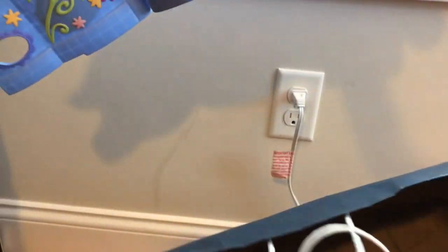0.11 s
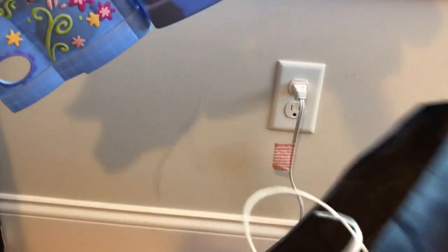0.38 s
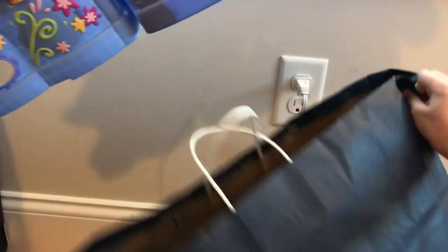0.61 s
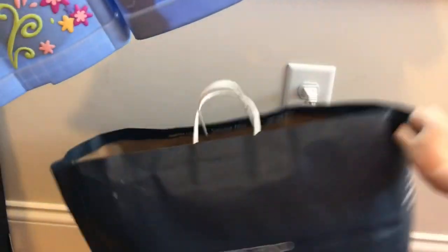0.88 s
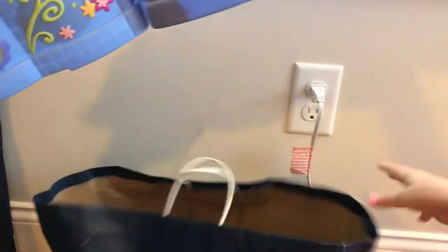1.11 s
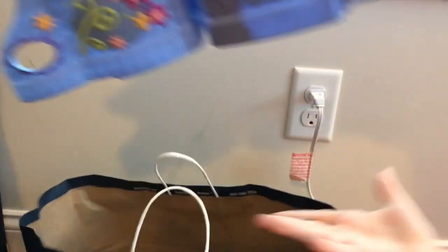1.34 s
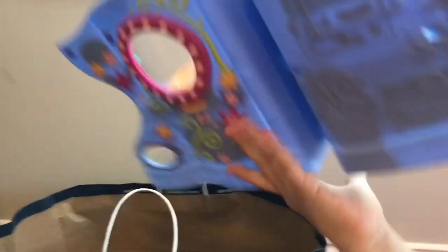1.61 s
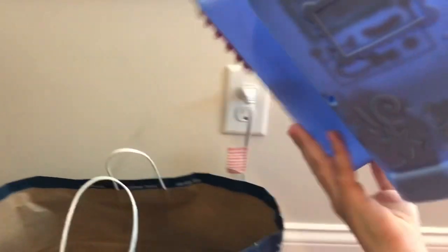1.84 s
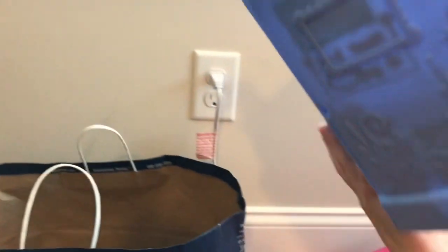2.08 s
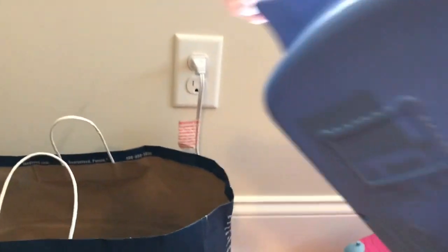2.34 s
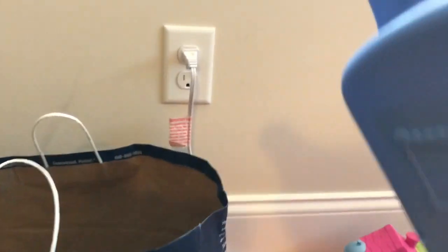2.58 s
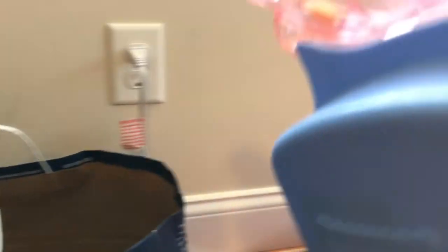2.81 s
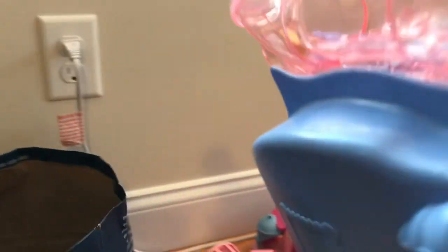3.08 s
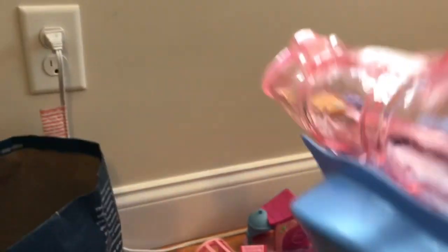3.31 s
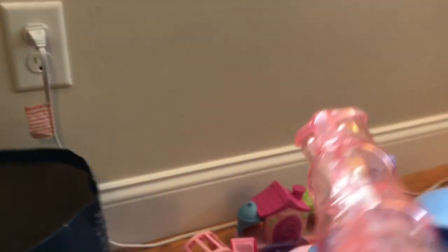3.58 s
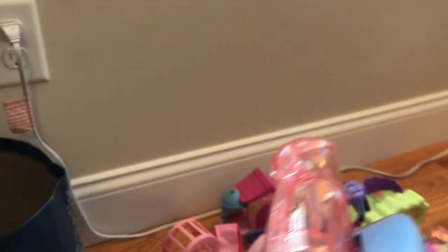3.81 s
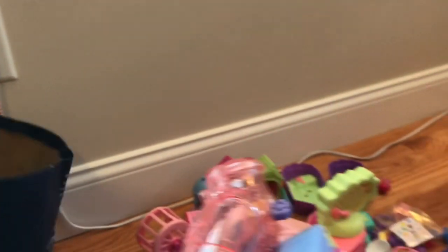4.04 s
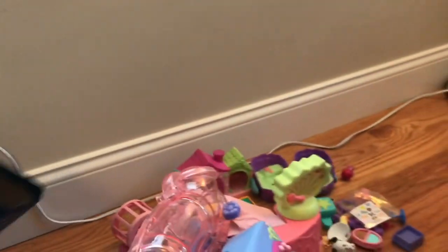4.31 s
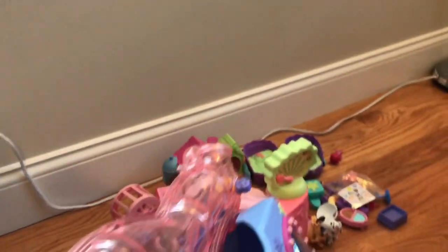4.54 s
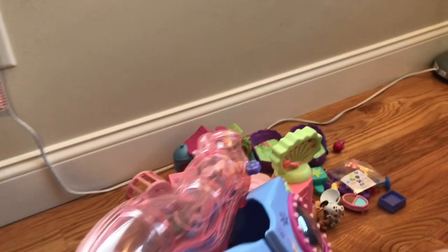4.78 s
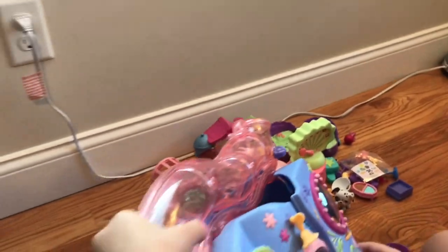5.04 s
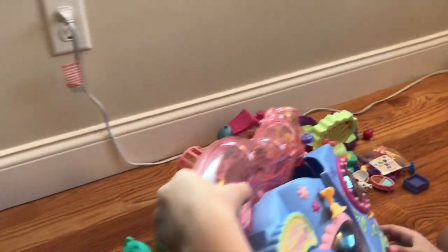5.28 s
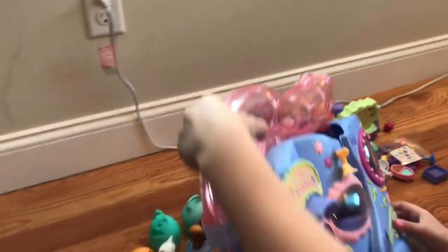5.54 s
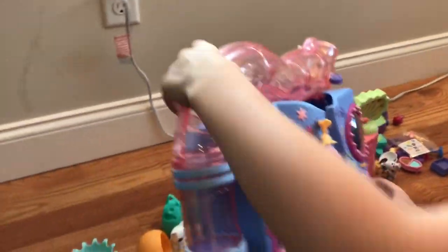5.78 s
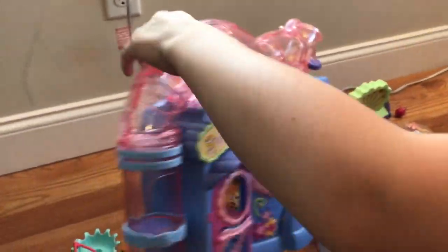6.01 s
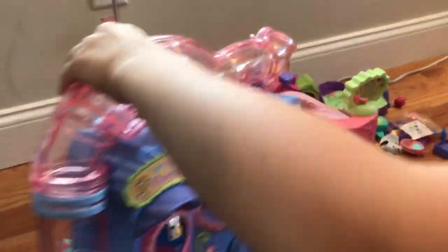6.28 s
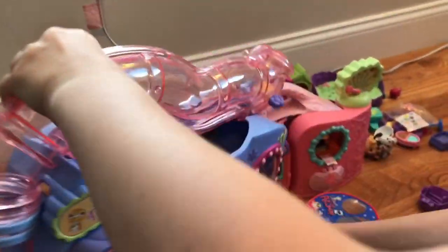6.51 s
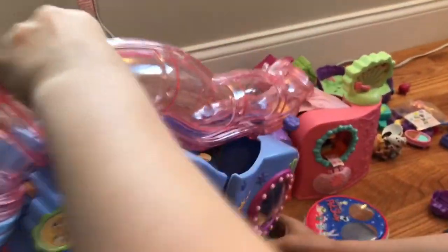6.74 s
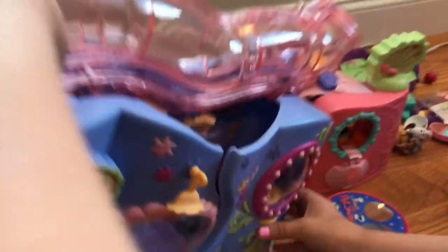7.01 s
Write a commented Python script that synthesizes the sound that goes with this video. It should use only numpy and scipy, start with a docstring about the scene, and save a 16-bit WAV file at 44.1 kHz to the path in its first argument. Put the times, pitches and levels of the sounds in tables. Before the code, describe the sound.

Hollow plastic toys clack, knock and rattle on a wooden floor after a paper bag rustles, with scrapes, shuffles and a brief hollow squeak.

```python
"""Hollow plastic toys are lifted, turned and set down on a wooden floor in a small room; a paper bag shifts first.
Each knock is a short rattle of contacts that rings thin-shell modes and the struck panel.
Between knocks, random grains of skin on paper and plastic hiss and scrape; a twisted tube hoots.
Soft thumps of low noise, a short room tail and a quiet hum of shaped noise lie beneath."""
import sys
import numpy as np
from scipy import signal
from scipy.fft import rfft, irfft
from scipy.io import wavfile
from scipy.ndimage import uniform_filter1d

SR = 44100
rng = np.random.default_rng(int(sys.argv[2]) if len(sys.argv) > 2 else 0)


def dump(signal):
    """Clip the signal to [-1, 1] and save it as 16-bit WAV at the path in sys.argv[1]."""
    limited = np.clip(np.atleast_2d(signal).T, -1, 1)
    pcm = np.round(limited * 32767).astype(np.int16)
    wavfile.write(sys.argv[1], SR, pcm)


def field_ratio(decibels):
    """Amplitude ratio for a level in dB (20 dB per decade); scalars and array-likes work."""
    return 10 ** (np.asarray(decibels, dtype=float) / 20)


N = 314289

# knocks, short bursts of contacts: start_s, level_db, panel_hz, thud_db and tick_db (both re level_db)
KNOCK_ROWS = [(0.009, -17, 346, -40, -15), (0.046, -27, 351, -34, -42), (0.063, -41, 1100, -30, -2),
              (0.132, -31.5, 1970, -29, -19), (0.19, -33.5, 1990, -26, -12), (0.198, -33.5, 1970, -29, -23),
              (0.238, -51, 1510, -28, 1), (0.293, -18, 1050, -21, -39), (0.354, -28.5, 1120, -19, -14),
              (0.387, -37, 395, -10, -2), (0.415, -31, 1120, -24, -3), (0.669, -59.5, 905, -12, 5.5),
              (0.82, -26, 1470, -15, -16.5), (1.026, -22.5, 1370, -12.5, -27),
              (1.174, -27.5, 1290, -12.5, -19.5), (1.262, -40, 900, -5, -16), (1.29, -29, 2060, -23, -15.5),
              (1.349, -32.5, 590, -10.5, -32), (1.713, -8.5, 388, -55, -23), (1.755, -19, 387, -41, -25),
              (1.774, -18.5, 372, -49, -26), (1.909, -25, 616, -10.5, -23.5),
              (2.101, -18.5, 386, -16, -31.5), (2.209, -32.5, 1440, -14, -29),
              (2.241, -30.5, 1330, -35, -18), (2.263, -2.3, 2440, -49, -13), (2.271, -3, 1250, -51, -13),
              (2.275, -5, 1010, -47, -15.5), (2.334, -10.5, 810, -51, -13.5),
              (2.403, -18.5, 2400, -44, -11.5), (2.42, -16.5, 760, -35, -17.5), (2.502, -5, 470, -44, -12),
              (2.517, -7, 820, -20, -31), (2.617, -19.5, 574, -11.5, -22), (2.856, -34, 4730, -30, -23),
              (2.958, -15.5, 545, -6.5, -20), (2.966, -21.5, 476, -13, -26), (3.048, -31, 604, -18, -20),
              (3.079, -32.5, 890, -10, -15.5), (3.203, -17, 494, -9.5, -24.5), (3.336, -25.5, 495, -7, -35),
              (3.396, -39.5, 490, 7, -42), (3.429, -42.5, 563, 1, -28), (3.497, -42, 2200, -25, -11.5),
              (3.552, -33, 600, -11.5, -27), (3.634, -39, 1520, -15, -18), (3.931, -17.5, 2750, -18.5, -27),
              (3.963, -20, 950, -21, -25.5), (4.008, -27, 1520, -19, -21.5), (4.184, -16.5, 319, -43, -19),
              (4.247, -32.5, 1570, -19, -20), (4.412, -16.5, 1510, -25, -15), (4.541, -28, 660, -36, -13.5),
              (4.567, -56, 550, -27, 19), (4.689, -37, 400, -17, -13), (5.047, -39.5, 474, -8.5, -17),
              (5.132, -39, 1610, -23, -9), (5.338, -39.5, 714, -8, -36), (5.926, -37.5, 676, -22, -37),
              (6.006, -28, 566, -35, -24.5), (6.304, -30.5, 1500, -16, -35), (6.408, -34, 2700, -18, -19),
              (6.559, -25.5, 1510, -17, -46), (6.671, -35, 690, -14, -12), (6.737, -25, 670, -17.5, -27),
              (6.789, -27.5, 4800, -15, -9), (6.898, -34, 325, -6, -25)]
# tumbles, longer runs as loose parts roll over: start_s, level_db, panel_hz, tick_db (re level_db),
# length_s (knock() limits it to 0.001-0.09)
TUMBLE_ROWS = [(0.309, -29.5, 2380, -11.5, 0.031), (0.427, -32.5, 596, -24, 0.12),
               (0.494, -26, 1930, -18.5, 0.024), (1.09, -13.5, 1490, -17.5, 0.043),
               (1.105, -12.5, 303, -26, 0.028), (1.689, -25.5, 1520, -23, 0.13),
               (2.319, -6, 796, -23, 0.019), (2.467, -16.5, 1290, -10, 0.019),
               (2.599, -22, 656, -20.5, 0.021), (2.709, -30, 447, -48, 0.065),
               (2.743, -21, 630, -25.5, 0.027), (2.78, -23.5, 450, -29, 0.025),
               (2.849, -29, 494, -45, 0.014), (2.865, -23, 484, -29.5, 0.022),
               (2.895, -25.5, 450, -23, 0.021), (3.017, -34, 380, -51, 0.036),
               (3.594, -26.5, 580, -30, 0.021), (3.897, -29, 320, -34, 0.1),
               (4.602, -36.5, 1200, -40, 0.028), (6.218, -40, 840, -24, 0.0059),
               (6.242, -30, 575, -37, 0.12), (6.456, -38.5, 1230, -23, 0.038), (6.5, -28, 650, -38, 0.041),
               (6.859, -36, 900, -27, 0.07), (7.089, -34.5, 1050, -28, 0.019)]
KNOCK_S = 0.0077  # decay time of a knock's contacts


def evened(x):
    """Scales to rms 1."""
    return x / np.sqrt(np.mean(x ** 2) + 1e-20)


def opening(x):
    """Scales so that the loudest 10 ms have rms 1."""
    return x / np.sqrt(uniform_filter1d(x ** 2, SR // 100).max() + 1e-20)


def read(points, hz):
    """Reads a spectrum on a log-frequency axis."""
    f, value = np.transpose(points)
    return np.interp(np.log(hz + 1), np.log(f + 1), value)


def coloured(x, spectrum):
    """Gives x the spectrum, rms 1."""
    gain = field_ratio(read(spectrum, np.fft.rfftfreq(len(x), 1 / SR)))
    return evened(irfft(rfft(x) * gain, len(x)))


def filtered(x, hz, kind):
    """Butterworth filter from a second-order prototype."""
    return signal.lfilter(*signal.butter(2, hz, kind, fs=SR), x)


def wander(size, width):
    """Slow random curve of rms 1: noise averaged over width samples."""
    return evened(uniform_filter1d(rng.standard_normal(size), width))


def crackle(size, per_s, spread_db):
    """Contacts at random times, of random sign and size, a few much larger than the rest."""
    hit = rng.random(size) < per_s / SR
    sign = rng.standard_normal(size)
    big = rng.exponential(1, size)
    return hit * sign * field_ratio(spread_db * np.minimum(big, 4))


def ring(hz, db, t60, t):
    """One dying mode."""
    return field_ratio(db - 60 * t / t60) * np.sin(2 * np.pi * hz * t)


def knock(level_db, panel_hz, thud_db, tick_db, length_s, hold, rise_s):
    """A burst of contacts rings low modes (thud), upper modes (clack), the struck panel and a dry tick."""
    # modes of the thin plastic shells: pitch_hz, level_db (relative), t60_s
    shell = [(147, -34, 0.1), (241, -37, 0.099), (429, -33.5, 0.08), (494, 33.5, 0.016),
             (880, -13.5, 0.051), (968, 4, 0.015), (1078, 8, 0.0037), (1910, 2.5, 0.0099),
             (2364, -0.5, 0.034), (3620, 3.5, 0.0024)]
    clack_db, panel_db = -11, -12.5
    panel_t60_s = 0.02 * (1000 / panel_hz) ** 0.45
    split = 0.069  # spacing of five close modes per shell mode, share of pitch
    focus_db = 1  # loss per octave away from the struck panel
    softness = 0.23  # dB per octave for each dB of tick below -13: soft contacts dull the upper modes

    t = np.arange(SR // 6) / SR
    contacts = crackle(len(t), 15000, 0.9)
    contacts *= field_ratio(3.0 * (1 - np.exp(-t / KNOCK_S)) * wander(len(t), 110))  # clumps after the first blow
    contacts *= np.exp(-(t / np.clip(length_s, .001, .09)) ** hold)
    contacts *= 1 - np.exp(-t / rise_s)  # the surfaces take a moment to meet

    # each mode is spread into five close pitches, jittered at random per knock
    detune = 1 + split * (np.linspace(-2, 2, 5) + rng.random((len(shell), 5)) - .5)
    thud, clack = np.zeros(len(t)), np.zeros(len(t))
    for k, ((hz, db, t60), d) in enumerate(zip(shell, detune)):
        focus = -focus_db * abs(np.log2(hz / panel_hz))
        dulling = softness * min(tick_db + 13, 0) * np.log2(hz / 1000)
        mode = ring(hz * d[:, None], db + focus + dulling, t60, t).sum(0)
        if hz < 600:
            thud += mode
        else:
            clack += mode * (-1) ** k
    pair_hz = panel_hz * np.array([[.955], [1.045]])  # a close pair that beats
    panel = ring(pair_hz, 0, panel_t60_s, t).sum(0)
    clack = filtered(clack, 450, "high")  # small panels send out no bass
    panel = filtered(panel, panel_hz / 2, "high")
    thud, clack, panel = (signal.fftconvolve(contacts, m)[:len(t)] for m in (thud, clack, panel))

    tick = filtered(contacts, 2900, "high")
    tick = filtered(tick, 6000, "low") + field_ratio(-14.0) * filtered(tick, 14500, "low")  # dull body, thin bright edge
    parts = zip((thud_db, clack_db, panel_db, tick_db), (thud, clack, panel, tick))
    return field_ratio(level_db) * sum(field_ratio(db) * opening(x) for db, x in parts)


def knocks():
    """Knocks decay near-exponentially; tumbles use a higher hold: a flatter start and a steeper end."""
    out = np.zeros(N + SR)
    rows = [(*row, KNOCK_S, 1.2, 0.00046) for row in KNOCK_ROWS]  # length_s, hold, rise_s
    for s, db, hz, tick_db, length_s in TUMBLE_ROWS:
        rows.append((s, db, hz, -19, tick_db, length_s, 1.72, 0.0034))
    for s, *row in rows:
        sound = knock(*row)
        out[round(s * SR):][:len(sound)] += sound
    return out[:N]


def settling(t60_s=0.13):
    """Each knock leaves a shuffle envelope that dies away; its size follows the knock."""
    t, jolts = np.arange(SR) / SR, np.zeros(N)
    for s, level_db, *_ in KNOCK_ROWS + TUMBLE_ROWS:
        jolts[round(s * SR)] = field_ratio(level_db)
    return signal.fftconvolve(jolts, field_ratio(-60 * t / t60_s))[:N]


def rattle(per_s=30, t60_s=0.008):
    """Loose parts tick against the shell; each of twelve short modes has its own ticks."""
    t, out = np.arange(SR // 40) / SR, np.zeros(N)
    for hz in np.geomspace(400, 3200, 12):
        out += signal.oaconvolve(crackle(N, per_s, 1.2), ring(hz, 0, t60_s, t))[:N]
    return evened(out)


def sliding(edge_s=0.014):
    """Dense fine grains hiss; coarser catches scrape through the hollow bodies."""
    # strokes of skin over paper and plastic: start_s, end_s (fade-out ends 2 edge_s later), hiss_db, change_db
    strokes = [(0.177, 0.282, -84, 34), (0.31, 0.395, -59, 8), (0.404, 0.478, -40.5, -2),
               (0.904, 1.016, -49.5, -6.5), (1.027, 1.08, -29, -21), (1.238, 1.4, -57, -1),
               (1.423, 1.497, -46.5, -15), (2.292, 2.395, -24, -24), (2.545, 2.65, -40, -20),
               (3.297, 3.343, -44.5, -10.5), (3.621, 3.718, -56.5, 2), (3.735, 3.85, -45, -10.5),
               (3.843, 4.078, -52.5, -6), (4.097, 4.164, -50, -18), (4.185, 4.397, -56, 4.5),
               (4.448, 4.54, -52.5, -11), (4.568, 4.743, -51, -8), (4.833, 4.894, -40.5, -6.5),
               (4.918, 5.005, -46, -14.5), (5.05, 5.086, -44.5, -10), (5.12, 5.232, -43.5, -9),
               (5.249, 5.35, -45.5, -8.5), (5.363, 5.634, -49, -1), (5.704, 5.863, -49.5, -4.5),
               (5.924, 6.14, -58, 6), (6.227, 6.41, -50.5, -11), (6.614, 6.665, -46.5, -9),
               (6.742, 6.844, -46.5, -13)]
    # hiss spectrum: pitch_hz, level_db (relative)
    hiss_spectrum = [(500, -1), (1500, -4), (2500, -5), (6000, -6), (9500, -9.5), (10500, -12.5),
                     (13000, -9), (16000, -16.5)]
    # scrape spectrum: pitch_hz, level_db (relative)
    scrape_spectrum = [(35, -52), (60, -6.5), (223, 0.5), (848, -5), (1510, -7), (7000, -30.5),
                       (15400, -120)]
    # scrape as toys and bag are moved about: time_s, level_db
    moving = [(0.0, -31.5), (0.03, -33), (0.12, -58.5), (0.43, -37), (0.61, -54), (0.86, -72),
              (1.09, -46.5), (1.23, -48), (1.5, -55), (1.74, -75), (1.85, -53.5), (2.07, -57.5),
              (2.19, -59), (2.34, -50), (2.44, -62), (2.71, -46), (2.93, -48), (3.04, -56), (3.18, -58.5),
              (3.3, -59.5), (3.43, -50), (3.59, -57.5), (4.0, -53), (4.5, -50.5), (4.64, -59), (4.9, -55.5),
              (5.33, -77), (5.64, -60), (6.1, -55), (6.32, -60.5), (6.42, -47.5), (6.65, -48), (6.77, -56),
              (6.88, -56.5), (7.12, -53)]
    t, settle, pressure = np.arange(N) / SR, settling(), np.zeros(N)
    for start, end, hiss_db, change_db in strokes:
        now = slice(round(start * SR), round((end + 2 * edge_s) * SR))
        u = t[now] - start
        fade = np.clip(np.minimum(u, end - start + 2 * edge_s - u) / edge_s, 0, 1)
        pressure[now] += fade * field_ratio(hiss_db + change_db * u / (end - start))

    hiss = coloured(crackle(N, 12000, 2.4) * field_ratio(1.5 * wander(N, 1500)), hiss_spectrum)
    lumps = field_ratio(3.8 * wander(N, 600))  # the grip catches and lets go
    scrape = coloured(crackle(N, 6000, 2.36) * lumps, scrape_spectrum) + field_ratio(-7.0) * rattle()
    # strokes before 1.5 s also crinkle the paper bag
    crinkle = (t < 1.5) * coloured(crackle(N, 250, 3.6), hiss_spectrum)
    hiss = (hiss + field_ratio(-14.0) * crinkle) * pressure
    return hiss + scrape * (field_ratio(np.interp(t, *np.transpose(moving))) + field_ratio(-25) * settle)


def creak(width_hz=60):
    """Uneven slips feed the air column of a twisted, knocked tube; each hoot swells, then dies."""
    # hoots: start_s, level_db, pitch_hz, rise_s, t60_s, glide_hz_per_s
    hoots = [(5.4, -51, 362, 0.26, 0.065, 1160), (6.624, -31, 666, 0.026, 0.17, 4),
             (6.731, -22.5, 685.5, 0.0043, 0.085, 0), (6.78, -33, 699, 0.02, 0.049, 0)]
    t, out, r = np.arange(N) / SR, np.zeros(N), np.exp(-np.pi * width_hz / SR)
    slips = crackle(N, 3800, 0.52) * np.exp(2j * np.pi * rng.random(N))
    drift = signal.lfilter([1 - r], [1, -r], slips)
    drift /= abs(drift + 1e-12) ** 0.76  # a kept-up hoot wavers less than noise
    for s, db, hz, rise, t60, glide in hoots:
        u = t - s
        swell = np.clip(u / rise, 0, 1) ** 2 * field_ratio(db - 60 * np.maximum(u - rise, 0) / t60)
        tone = drift * np.exp(2j * np.pi * (hz + glide * u / 2) * u)
        out += swell * evened(tone.real)
    return out


def thumps(rise_s=0.025):
    """Weight landing on the boards: a soft puff of low noise."""
    # landings: start_s, level_db (at the top of the puff)
    landings = [(0.018, -48), (0.4, -46), (1.111, -34), (2.32, -44), (3.953, -42.5), (4.41, -46),
                (4.637, -45.5), (5.82, -47.5), (6.27, -43), (6.505, -40.5), (6.888, -40.5)]
    t, envelope = np.arange(N) / SR, np.zeros(N)
    boards = filtered(rng.standard_normal(N), [65, 260], "band")
    for s, db in landings:
        u = np.maximum(t - s, 0) / rise_s
        envelope += field_ratio(db) * u * np.exp(1 - u)
    return evened(boards) * envelope


def room(x, turns_per_s=7):
    """Sparse taps, each band with its own decay; three random tails take turns steadily, for a smoother room."""
    # reverberation: pitch_hz, t60_s
    decay = [(200, 0.29), (600, 0.23), (1500, 0.25), (4000, 0.23), (10000, 0.19)]
    out, at = np.zeros(N), np.arange(200, SR // 2 - 20, 20)
    for k in range(3):
        taps = np.zeros(SR // 2)
        taps[at + rng.integers(0, 20, len(at))] = rng.choice([-1., 1.], len(at))
        hz, t, z = signal.stft(taps, SR, nperseg=256)
        z = z * field_ratio(-60 * t / read(decay, hz)[:, None])
        tail = signal.istft(z, SR, nperseg=256)[1]
        share = np.cos(np.pi * (turns_per_s * np.arange(N) / SR + k / 3)) * np.sqrt(2 / 3)
        out += signal.fftconvolve(x * share, tail / np.linalg.norm(tail))[:N]
    return out


def room_hum(level_db=-57):
    """Steady noise, strongest in the bass."""
    # hum spectrum: pitch_hz, level_db (relative)
    spectrum = [(20, -47), (33, -4.5), (46, 9.5), (64, 6.5), (99, -0.5), (714, -18.5), (8360, -23.5),
                (10400, -27), (14000, -25), (16000, -31)]
    return field_ratio(level_db) * coloured(rng.standard_normal(N), spectrum)


def scene():
    """Toys and hands in the room, over its hum; small shells send out little deep bass."""
    near = knocks() + sliding() + creak()
    near = signal.sosfilt(signal.butter(2, 110, "high", fs=SR, output="sos"), near)
    return (near + field_ratio(-10.0) * room(near) + thumps() + room_hum())[None]


def band_limit(x):
    """A steep low-pass at the top of the band."""
    return signal.sosfilt(signal.butter(12, 16490, fs=SR, output="sos"), x)


def record(dry):
    """Clips peaks at 0.9, then low-passes at 15.9 kHz."""
    edge = signal.firwin(255, 15900, window=("kaiser", 6), fs=SR)[None]
    mix = signal.oaconvolve(np.clip(dry, -.9, .9), edge, "same")
    return band_limit(mix)


dry = scene()
out = record(dry)
dump(out)
```